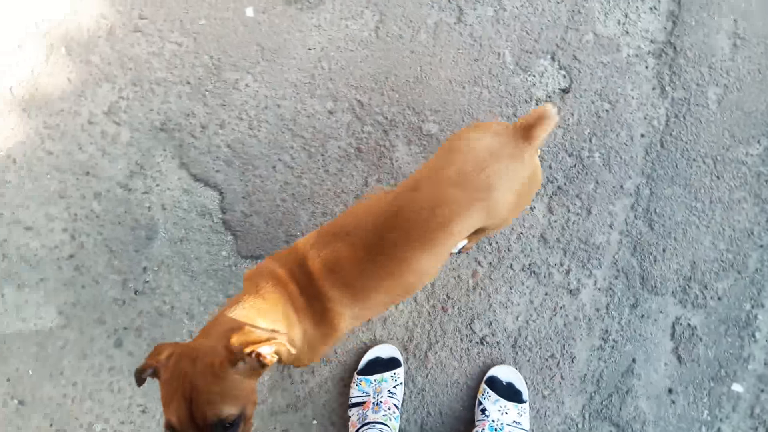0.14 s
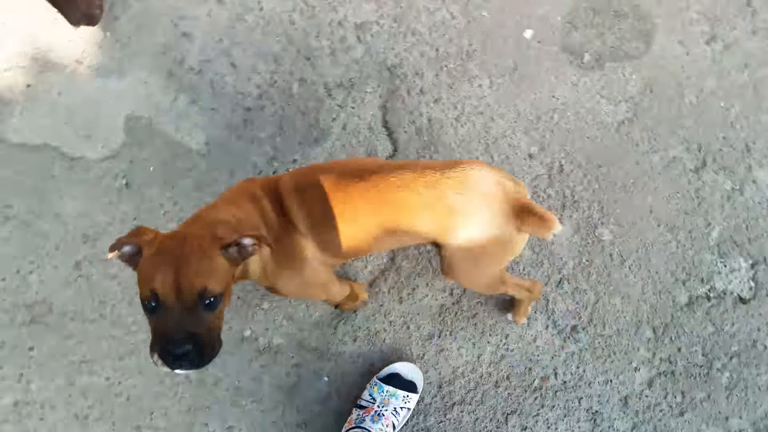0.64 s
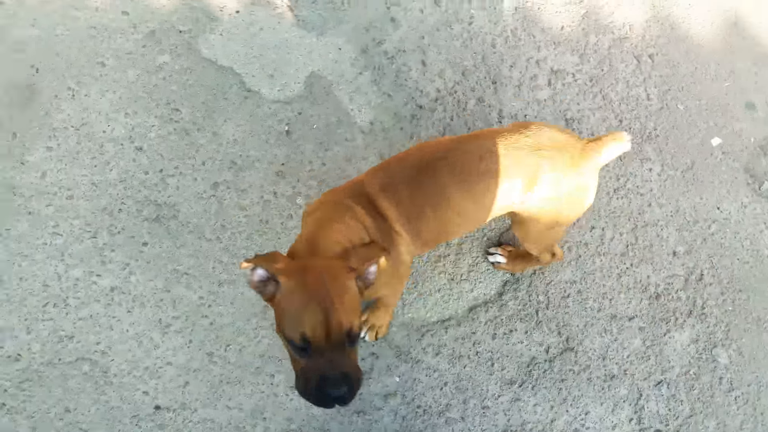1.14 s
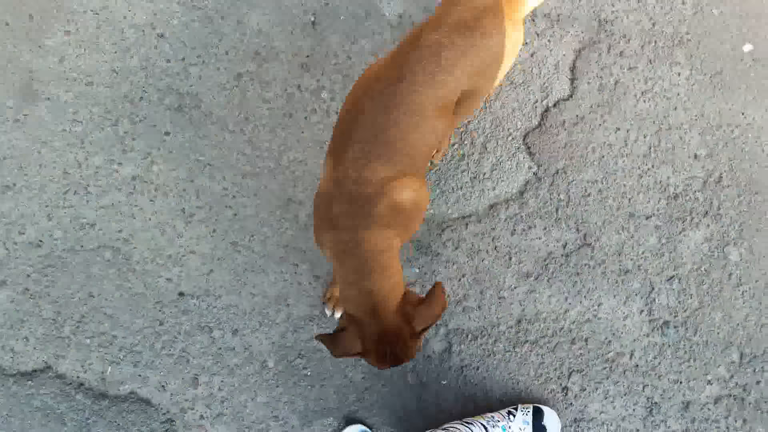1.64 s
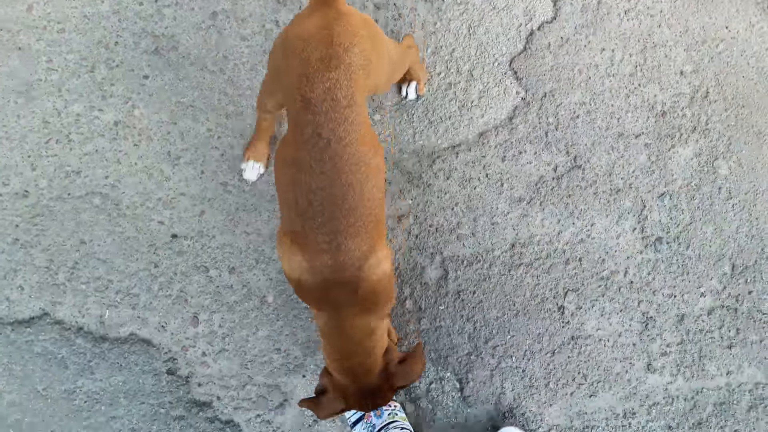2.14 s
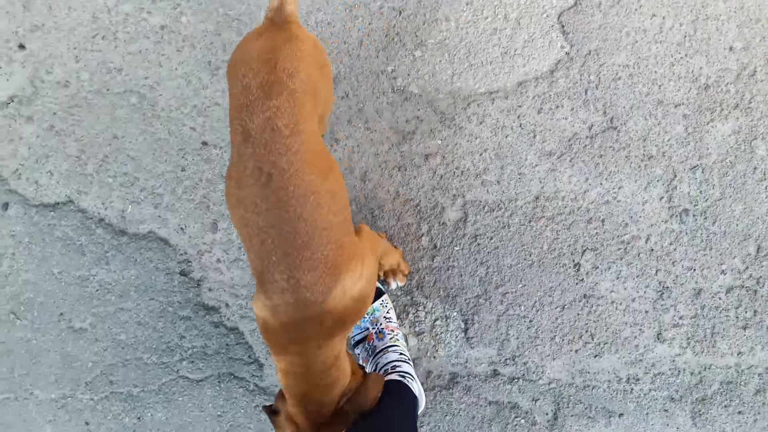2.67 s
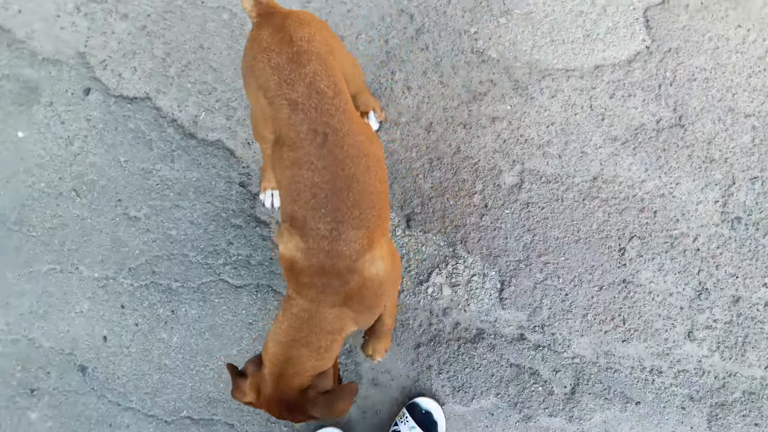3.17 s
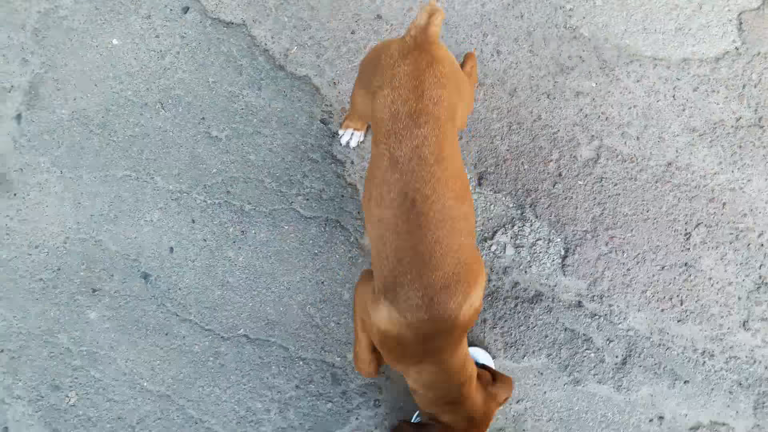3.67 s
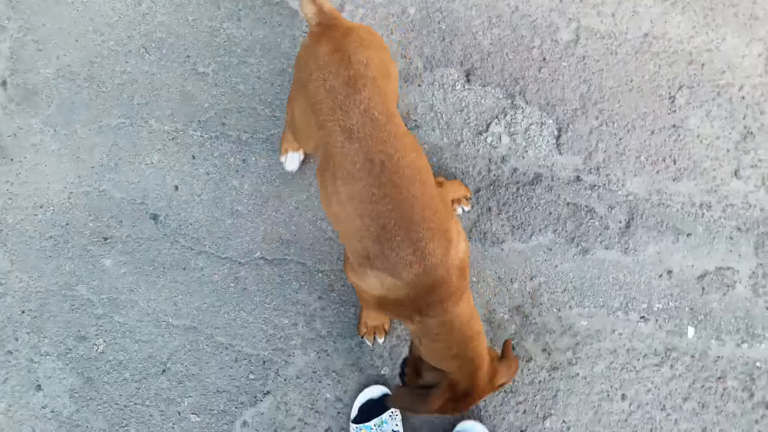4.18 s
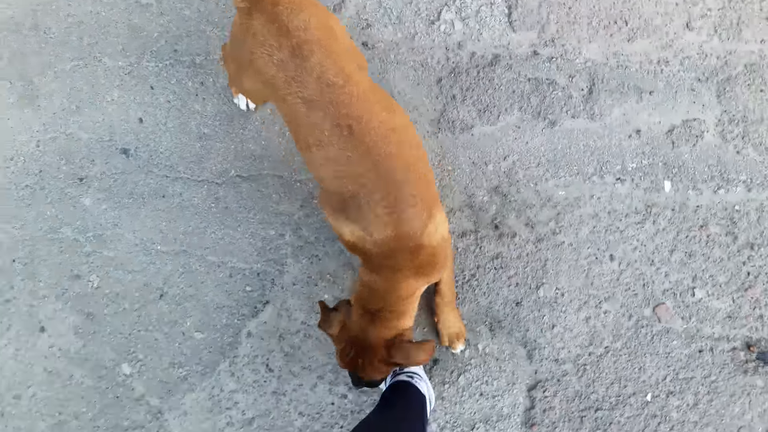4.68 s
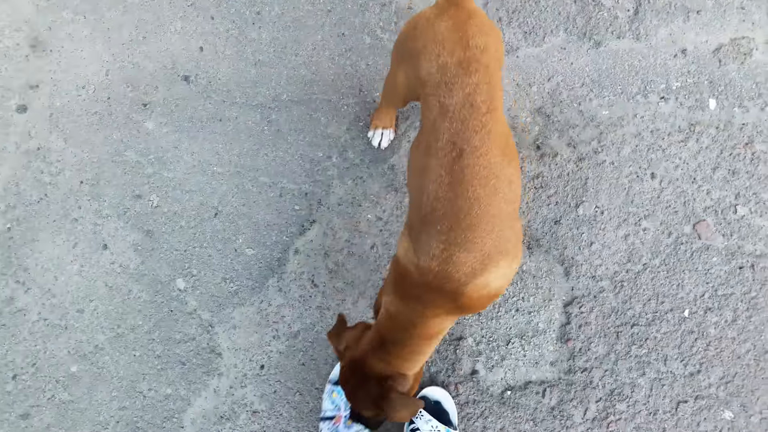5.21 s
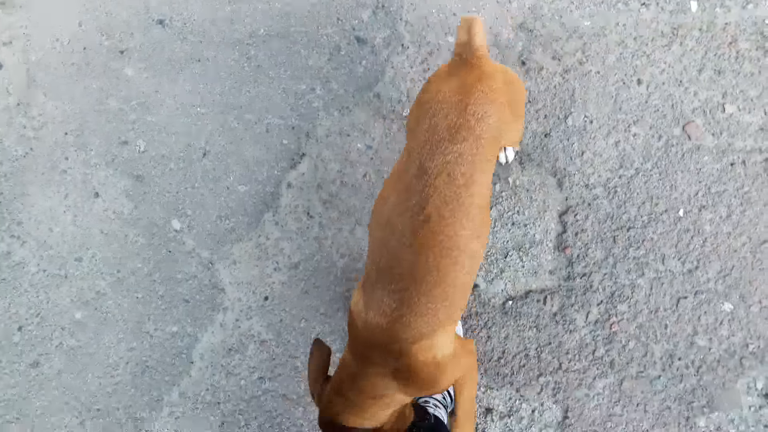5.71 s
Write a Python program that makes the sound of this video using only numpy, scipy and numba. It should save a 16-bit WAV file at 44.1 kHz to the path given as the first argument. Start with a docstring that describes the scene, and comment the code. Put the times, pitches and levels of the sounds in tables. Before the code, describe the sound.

Outdoors on a paved yard, shoes and claws scuff and tick, then a puppy close to the microphone growls low and gives a strong bark. It growls again, then barks together with a hoarser adult dog. A quiet lull with soft footsteps follows before a second loud double bark, more puppy growling and a last yap. Faint birds chirp far off; traffic hiss swells and fades.

```python
"""Traffic hiss, still air and rumble, all shaped noise, run throughout; the hiss swells, fades and returns.
From the start paws and shoes scuff (noise bursts) and tap (damped waves) on a paved yard; walls answer.
A puppy close by growls, then yaps and grunts: vocal-fold pulses and breath ring in moving cavities.
Later small birds call far off in gliding sine tones, and twice an adult dog barks with the puppy,
its clean rising start breaking into a hoarse roar."""
import sys
import numpy as np
from scipy import signal
from scipy.fft import rfft, irfft, next_fast_len
from scipy.io import wavfile
from scipy.ndimage import map_coordinates
from numba import njit

SR = 44100
rng = np.random.default_rng(int(sys.argv[2]) if len(sys.argv) > 2 else 0)


def dump(signal):
    """Clip the signal to [-1, 1] and save it as 16-bit WAV at the path in sys.argv[1]."""
    limited = np.clip(np.atleast_2d(signal).T, -1, 1)
    pcm = np.round(limited * 32767).astype(np.int16)
    wavfile.write(sys.argv[1], SR, pcm)


def volts_from_db(level):
    """Convert decibel levels to linear amplitude ratios."""
    exponent = np.asarray(level, float) / 20
    return 10 ** exponent


N = 257103


def unit(x):
    """RMS normalisation: scales x to rms 1."""
    return x / np.sqrt(np.mean(x ** 2) + 1e-20)


def colour(x, points):
    """Linear filtering in the spectrum: x shaped by (hz, gain_db) points on a log axis."""
    size = next_fast_len(len(x) + 8192)
    hz, db = np.transpose(points)
    bins_hz = np.fft.rfftfreq(size, 1 / SR)
    gain = volts_from_db(np.interp(np.log(bins_hz + 1), np.log(hz + 1), db))
    return irfft(rfft(x, size) * gain, size)[:len(x)]


def curve(rows):
    """Linear interpolation: one value per sample from (time_s, value) rows."""
    return np.interp(np.arange(N) / SR, *np.transpose(rows))


def wobble(n, rate):
    """Band-limited fluctuation: a smooth random curve with rate knots a second."""
    knots = rng.standard_normal(int(n * rate / SR) + 4)
    return map_coordinates(knots, [np.arange(n) * rate / SR])


def add(out, s, x):
    """Superposition: mixes x into out from time s."""
    part = out[round(s * SR):][:len(x)]
    part += x[:len(part)]


def background():
    """Stationary noise: spectra of traffic, still air and rumble, with slowly fluctuating levels."""
    # distant traffic level: time_s, level_db
    traffic_level = [(0, -58), (.5, -52.5), (1, -46.5), (1.5, -48.5), (1.85, -56), (2.4, -66.5), (3, -84.5),
                     (4, -76), (4.5, -73), (5, -62.5), (5.83, -58)]
    # spectrum of the traffic hiss: hz, gain_db
    tyres = [(25, -39), (150, 6.5), (400, -7.5), (1000, -5.5), (2000, -9), (4000, -8), (6000, -15.5),
             (7300, -24), (8100, -39), (9500, -31.5), (12000, -25.5), (16000, -30)]
    # spectrum of the still air: hz, gain_db
    air_spectrum = [(25, -13), (60, -12), (270, -16.5), (600, -22), (1200, -19), (2000, -30.5),
                    (4000, -29.5), (6000, -31.5), (8000, -52), (12000, -42.5), (16000, -47)]
    # low rumble level: time_s, level_db
    rumble_level = [(0.0, -61), (1.91, -75), (2.66, -87.5), (5.83, -63)]
    air_db = -69.5
    traffic = unit(colour(rng.standard_normal(N), tyres))
    traffic *= volts_from_db(curve(traffic_level) + 1.2 * wobble(N, 7.8))
    air = unit(colour(rng.standard_normal(N), air_spectrum))
    air *= volts_from_db(air_db + 0.56 * wobble(N, 7))
    rumble_spectrum = [(15, -20.0), (30, -5.5), (80, 4.5), (140, -29.5), (400, -91)]
    rumble = unit(colour(rng.standard_normal(N), rumble_spectrum))
    rumble *= volts_from_db(curve(rumble_level) + 0.89 * wobble(N, 3))
    return traffic + air + rumble


def taps(events, turns, noisy):
    """Damped oscillation: each contact loses 20 dB in the given turns, with some crackle."""
    out, t = np.zeros(N), np.arange(SR // 20) / SR
    for s, db, hz in events:
        wave = np.sin(2 * np.pi * hz * t) + noisy * rng.standard_normal(len(t))
        add(out, s, volts_from_db(db + 2.0 - 20 * t * hz / turns) * wave)
    return out


def feet():
    """Impact and friction: claw ticks, dull footfalls and grit crunching in clumps under a sole."""
    # claws on the paving, levels ahead of gain and filter: start_s, level_db, pitch_hz
    claws = [(.0194, -43, 9400), (.0494, -48, 5850), (.0634, -40, 11580), (.0777, -39, 11360),
             (.1012, -49, 8800), (1.3618, -47.5, 9230), (1.4904, -50.5, 5760), (1.7644, -51, 5730),
             (2.4563, -58.5, 5160), (3.8911, -52.5, 4970), (3.9764, -51.5, 5040), (4.1834, -54, 5100),
             (4.6264, -55, 4900), (4.6528, -48.5, 4840), (4.7314, -57, 5370), (4.9501, -46, 5190),
             (5.7194, -46.5, 4486)]
    # soft footfalls, levels ahead of gain and filter: start_s, level_db, pitch_hz
    footfalls = [(.014, -35.5, 264), (.072, -63, 400), (.111, -40, 142.5), (2.447, -60, 392),
                 (2.512, -42.5, 496), (2.625, -45.5, 197), (2.639, -35.5, 513), (2.689, -47, 447),
                 (2.769, -45, 1200), (3.286, -42, 449.5), (3.401, -48.5, 196.5), (4.625, -38, 810),
                 (5.322, -29.5, 399.4)]
    # soles dragging over grit: peak_s, level_db, fade_db_per_s
    scuffs = [(0, -31, 357), (2.65, -57, 73.5), (3.26, -61, 298.5), (4.66, -71, 299), (5.738, -64.5, 106)]
    # spectrum of the grit: hz, gain_db
    grit = [(30, -32), (130, -6.5), (700, -7.5), (1600, -10.5), (3500, -14.5), (6000, -23.5), (8000, -40.5),
            (12000, -27.5), (16000, -31)]
    rise_db_per_s = 351.5
    ticks = colour(taps(claws, turns=5.0, noisy=0.27), [(800, -25.5), (3500, 6.5)])
    dull = [(30, -25.5), (150, 3), (1200, -3.5), (3000, -22.5), (16000, -54.5)]
    steps = colour(taps(footfalls, turns=1.6, noisy=2.3), dull)
    grains = rng.standard_normal(N) * volts_from_db(3 * wobble(N, 300))  # clumps of grains
    t = np.arange(N) / SR
    drag = np.zeros(N)
    for s, db, fade in scuffs:
        drag += volts_from_db(db - np.maximum(rise_db_per_s * (s - t), fade * (t - s)))
    return ticks + steps + drag * unit(colour(grains, grit))


def yard(x, delay):
    """Reverberation: after a delay in s, each frequency of the walls' answer decays at its own speed."""
    # decay time of the walls' answer: hz, t60_s
    decay = [(150, 0.6), (700, 0.29), (3000, 0.35), (8000, 0.28)]
    hz, t, z = signal.stft(rng.standard_normal(SR // 2), SR, nperseg=256)
    decay_hz, decay_s = np.transpose(decay)
    t60 = np.interp(np.log(hz + 1), np.log(decay_hz), decay_s)
    tail = signal.istft(z * volts_from_db(-60 * t / t60[:, None]), SR, nperseg=256)[1]
    late = np.pad(x, (round(delay * SR), 0))
    return signal.fftconvolve(late, tail / np.linalg.norm(tail))[:N]


@njit
def ring(x, turn, r):
    """Resonance: a two-pole filter of peak gain about 1 whose centre moves from sample to sample."""
    y = np.zeros(len(x))
    for i in range(2, len(x)):
        y[i] = (1 - r * r) / 2 * (x[i] - x[i - 2]) + r * turn[i] * y[i - 1] - r * r * y[i - 2]
    return y


def formant(x, hz, width_hz):
    """Cascaded resonance: three equal passes, scaled to keep white noise near rms 1."""
    turn, r = 2 * np.cos(2 * np.pi * hz / SR), np.exp(-np.pi * width_hz / SR)
    rung = ring(ring(ring(x, turn, r), turn, r), turn, r)
    return rung * np.sqrt(3 * SR / np.pi / width_hz)


def voice(calls, widths_hz, tone_db, nose_db, jitter, scatter_db, cheek_hz, cheek_db):
    """Source and filter: fold pulses and breath gated each cycle ring in three moving cavities and a fixed one."""
    # breathy top of a voice: hz, gain_db
    breath_top = [(3300, -59), (4000, 3.5), (5000, 4.5), (7000, -3.5), (8000, -26.5), (10000, -12.5),
                  (15000, -25), (17000, -59.5)]
    rasp = .2  # extra share of breath in the upper cavities
    out, top = np.zeros((2, N))
    for rows in calls:
        s, *cols = np.transpose(rows)
        t = np.arange(s[0], s[-1] + .02, 1 / SR)
        pitch, chest_db, chest, mouth_db, mouth, muzzle_db, muzzle, rough = [np.interp(t, s, c) for c in cols]
        rough = np.clip(rough, 0, 1)
        cycles = np.cumsum(pitch * (1 + jitter * rough * wobble(len(t), 120))) / SR
        strength = volts_from_db(scatter_db * rough * wobble(len(t), 70))  # uneven folds: the strength throbs
        pulses = np.diff(np.floor(cycles), prepend=0) * np.sqrt(SR / pitch)
        breath = 2 * (1 - cycles % 1) ** 2 * rng.standard_normal(len(t))
        edge = np.clip(np.minimum(t - s[0], s[-1] + 0.015 - t) / 0.0049, 0, 1)
        swell = edge * strength
        source = swell * (np.sqrt(1 - rough) * pulses + np.sqrt(rough) * breath)
        airy = rough + rasp * (1 - rough)
        raspy = swell * (np.sqrt(1 - airy) * pulses + np.sqrt(airy) * breath)
        sound = volts_from_db(chest_db + tone_db) * swell * np.sin(2 * np.pi * cycles)
        chest_width, mouth_width, muzzle_width = widths_hz
        sound += volts_from_db(chest_db) * formant(source, chest, chest_width)
        sound += volts_from_db(mouth_db) * formant(source, mouth, mouth_width)
        sound += volts_from_db(muzzle_db) * formant(raspy, muzzle, muzzle_width)
        sound += volts_from_db(muzzle_db + cheek_db) * formant(raspy, cheek_hz + 0 * t, 450)
        add(out, s[0], sound)
        add(top, s[0], volts_from_db(muzzle_db + nose_db) * swell * breath)
    return out + colour(top, breath_top)


def growl(tone, rows, rough):
    """Tract coupling: chest resonance, muzzle level and roughness follow how far the mouth is open."""
    chest_lift_hz_per_db = 2  # an opening mouth lifts the chest resonance
    smoother_per_db = .009  # roughness rises as the mouth shuts
    chest, muzzle, under = tone
    call = []
    for s, hz, chest_db, mouth_db, mouth in rows:
        opening_db = mouth_db - chest_db
        muzzle_db = mouth_db - np.interp(s, *np.transpose(under))
        call.append((s, hz, chest_db, chest + chest_lift_hz_per_db * opening_db, mouth_db, mouth,
                     muzzle_db, muzzle, rough - smoother_per_db * opening_db))
    return call


def puppy():
    """Source and filter in one small throat: growls, grunts and yaps."""
    # growls: (chest_hz with mouth level equal to chest level, muzzle_hz, [time_s, muzzle_under_mouth_db]),
    # then the curve: time_s, pitch_hz, chest_db, mouth_db, mouth_hz
    growls = [ ((333, 1000, [(.45, 39), (.7, 16.5)]), [(.17, 115.1, -49.5, -75, 750),
              (.34, 125.6, -48.5, -68.5, 750), (.385, 136.4, -35, -47.5, 700),
              (.41, 138.9, -31, -41.5, 714), (.47, 132.7, -46, -67, 730), (.56, 160.2, -45.5, -60.5, 760),
              (.64, 156, -40.5, -65.5, 805), (.74, 157, -43, -54, 760), (.8, 158.2, -40, -56.5, 780),
              (.89, 154.3, -38.5, -69.5, 790)]), ((326, 1800, [(1.2, 23.5), (1.36, 10.5), (1.5, 27)]),
              [(1.07, 124, -30, -40.5, 850), (1.108, 110.7, -42.5, -49.5, 850), (1.155, 111, -38, -56, 895),
              (1.195, 129, -31, -30, 935), (1.24, 148.6, -27, -28, 806), (1.3, 150.2, -28, -40, 950),
              (1.36, 155.7, -29, -37, 966), (1.409, 151.7, -36.5, -40.5, 1136),
              (1.444, 147.9, -41, -54.5, 1120), (1.52, 143.6, -39.5, -34, 800),
              (1.55, 144.8, -42.5, -36, 917), (1.575, 144.2, -44.5, -58, 910), (1.62, 143, -56, -70, 910)]),
              ((271, 2910, [(4.1, 5), (4.3, 24), (4.8, 15), (5.02, 33.5)]), [(4.081, 133, -45.5, -38, 930),
              (4.159, 128.2, -50.5, -68, 800), (4.241, 143.2, -41, -73, 610),
              (4.34, 158.1, -40, -66.5, 645), (4.44, 145.7, -44.5, -64.5, 728),
              (4.53, 131.8, -47, -60, 838), (4.66, 126.5, -44, -58, 855), (4.734, 118.5, -40, -44, 1071),
              (4.949, 109.1, -42, -51.5, 1000), (5.002, 110.1, -36.5, -36.5, 991),
              (5.051, 112.2, -38, -33.5, 1046), (5.135, 117.9, -41.5, -37.5, 1057),
              (5.155, 126.3, -54, -51, 1000)]), ((290, 2720, [(5.8, 18)]), [(5.762, 62, -46.5, -38.5, 950),
              (5.79, 104, -45, -40, 933), (5.829, 111.3, -38.5, -31.5, 1050)]), ]
    # grunts: peak_s, level_db
    grunts = [(2.475, -59.5), (2.99, -64.5), (3.234, -62)]
    # barks: (chest_db, chest_share of the swell, chest_lift_hz and widest_mouth_hz at top pitch, muzzle_hz),
    # then the curve: time_s, pitch_hz, mouth_db
    barks = [ ((-12, 0.82, 138, 1290, 2400.5), [(.885, 154.6, -67), (.915, 201.6, -35),
             (.945, 288.4, -16.5), (.98, 329, -22), (1.02, 273.4, -35.5), (1.075, 129.4, -43)]),
             ((-29.5, 0.44, 14, 1358, 2454.5), [(1.908, 303.8, -17), (1.93, 446, -13), (1.99, 458.2, -36),
             (2.02, 319.2, -32), (2.055, 255.7, -29.5), (2.09, 268.3, -46.5)]),
             ((-30, 0.22, 20, 869, 2446.5), [(3.632, 381.3, -17), (3.65, 455.9, -15), (3.68, 424.6, -13),
             (3.72, 342.3, -29), (3.76, 238.7, -19), (3.81, 175.4, -62)]), ((-33, 0.37, 15, 1348.5, 2655),
             [(3.975, 375.8, -43), (3.99, 423, -34.5), (4.026, 465.6, -28), (4.048, 434.6, -31),
             (4.063, 351.7, -29.5), (4.085, 135.7, -38.5)]), ((-40.5, 0.05, 18, 1067.5, 2886.5),
             [(5.413, 348.4, -34), (5.43, 379.8, -25), (5.455, 468.3, -18), (5.478, 454.3, -20.5),
             (5.495, 370.8, -17.5), (5.51, 249.6, -36), (5.53, 200, -55.5)]), ]
    growl_rough = [.1, .18, .14, .2]  # with mouth level equal to chest level
    bark_rough = [.09, .18, .14, .06, .08]  # at the top pitch of each bark
    low = [growl(*c, r) for c, r in zip(growls, growl_rough)] + [grunt(*c) for c in grunts]
    yaps = [bark(*c, r) for c, r in zip(barks, bark_rough)]
    low_voice = voice(low, widths_hz=[280, 400, 400], tone_db=-11, nose_db=-10.5,
                      jitter=.1, scatter_db=4, cheek_hz=4000, cheek_db=-9.5)
    high_voice = voice(yaps, widths_hz=[330, 480, 800], tone_db=-5, nose_db=-26,
                       jitter=.1, scatter_db=5.5, cheek_hz=1870, cheek_db=-2)
    return low_voice + high_voice


def bark(tone, rows, rough):
    """Fold tension: the mouth opens with the pitch, the chest rings on it, slackening folds rattle."""
    shut_mouth_hz, low_chest_hz, muzzle_under_db = 750, 241, 11
    slack_rough = .4  # slack folds rattle
    chest_db, share, lift, widest, muzzle = tone
    s, hz, db = np.transpose(rows)
    tense = hz / hz.max()
    chest = np.maximum(hz + lift * tense, low_chest_hz)
    mouth = shut_mouth_hz + (widest - shut_mouth_hz) * tense ** 2.1
    chest_level = chest_db + share * (db - db.max())
    rattle = rough + slack_rough * (1 - tense) ** 2
    return np.transpose([s, hz, chest_level, chest, db, mouth, db - muzzle_under_db, muzzle + 0 * s, rattle])


def birds():
    """Frequency modulation: far whistlers glide a sine tone, each repeating its own note."""
    # notes, ahead of each call's pitch factor and level: length_share, pitch_hz, level_db
    arch = [(0, 3660, -4.5), (.25, 4400, 5.5), (.5, 4550, 2), (1, 4384, -2)]
    slide = [(0, 6000, -4), (.2, 6250, 0), (.4, 5850, -2), (.65, 4700, -5), (1, 3400, -8)]
    rise = [(0, 3200, 1), (.35, 4000, 2.5), (.7, 4400, -13), (1, 4350, -8)]
    droop = [(0, 4390, -9), (.6, 4090, 2.5), (1, 4050, -4.5)]
    # calls of each note: start_s, length_s, pitch_factor, level_db
    arch_calls = [(1.79, 0.069, 1, -60.5), (2.154, 0.046, 0.97, -61)]
    slide_calls = [(3.343, 0.11, 0.95, -64.5), (3.525, 0.11, 0.98, -63.5), (4.795, 0.095, 0.98, -71),
                   (4.962, 0.083, 0.98, -61), (5.142, 0.087, 0.97, -58)]
    rise_calls = [(5.348, 0.11, 0.98, -62), (5.574, .12, 0.94, -58)]
    droop_calls = [(3.14, .11, 1, -70.5)]
    out = np.zeros(N)
    for note, calls in [(arch, arch_calls), (slide, slide_calls), (rise, rise_calls), (droop, droop_calls)]:
        share, hz, level_db = np.transpose(note)
        for s, length, factor, db in calls:
            u = np.arange(0, 1, 1 / (length * SR))
            tone = np.sin(2 * np.pi * np.cumsum(factor * np.interp(u, share, hz)) / SR)
            level = volts_from_db(db + np.interp(u, share, level_db)) * np.sin(np.pi * u) ** .4
            add(out, s, level * tone)
    return out


def roar(breaks, rows):
    """Register break: cavities follow the pitch until the voice breaks, then the chest settles."""
    chest_hz, jaw_hz, snout_hz = 760, 1552, 2410  # chest of the roar, highest mouth, snout
    chest_under_db, roar_gain_db, snout_under_db = 9.5, 11, 12  # chest and snout come up with the roar
    clean, hoarse, break_s = .06, .7, .015  # roughness before and after the break, its duration
    s, hz, db = np.transpose(rows)
    broken = np.clip((s - breaks) / break_s, 0, 1)
    chest = (1 - broken) * 1.07 * hz + broken * chest_hz
    mouth = np.minimum(2.9 * hz, jaw_hz)
    gain_db = roar_gain_db * broken
    snout_db = db - snout_under_db + 0.78 * gain_db
    rough = clean + (hoarse - clean) * broken
    return np.transpose([s, hz, db - chest_under_db + gain_db, chest, db, mouth, snout_db, snout_hz + 0 * s, rough])


def adult():
    """Source and filter in the adult dog's throat, whose pulses turn to breath at the break."""
    # barks: break_s at which the clean rising start turns to a hoarse roar,
    # then the curve: time_s, pitch_hz, mouth_db
    adult_barks = [ (1.912, [(1.87, 401.7, -63.5), (1.885, 440.6, -29), (1.9, 533.2, -15.5),
                   (1.912, 610, -16.5), (1.918, 797.5, -20.5), (1.975, 786, -15.5), (2.01, 744, -25),
                   (2.07, 701, -44.5)]), (3.64, [(3.606, 459, -49.5), (3.614, 516, -29),
                   (3.632, 570.1, -20), (3.65, 588.6, -19.5), (3.7, 555.5, -20), (3.75, 539.5, -31),
                   (3.81, 528.3, -43)]), ]
    return voice([roar(*c) for c in adult_barks], widths_hz=[330, 300, 1300], tone_db=-17.0, nose_db=-16,
                 jitter=.08, scatter_db=3.5, cheek_hz=4980, cheek_db=-29)


def grunt(s, db):
    """Brief phonation: a short closed-mouth push of the voice at steady pitch."""
    hz, chest, mouth, muzzle, rough = 130, 264, 680, 3000, .45  # pitch and cavities in Hz, roughness
    rise_s, fall_s, fade_db = 0.035, 0.04, 5.5
    levels = [(s - rise_s, db - fade_db), (s, db), (s + fall_s, db - fade_db)]
    return [(at, hz, level, chest, level - 13.5, mouth, level - 22, muzzle, rough) for at, level in levels]


def scene():
    """Direct and reverberant sound: near sources are dry, far ones wet."""
    ground, small, far, big = feet(), puppy(), birds(), adult()
    walls = volts_from_db(-13) * yard(ground, 0.015) + volts_from_db(-8.5) * yard(small, .02)
    walls += volts_from_db(3.0) * yard(far, .012) + volts_from_db(-1.5) * yard(big, .015)
    return (background() + ground + small + far + big + walls)[None]


def band_limit(x):
    """A steep low-pass at the top of the band."""
    return signal.sosfilt(signal.butter(12, 15800, fs=SR, output="sos"), x)


def record(dry):
    """Saturation and band limits: the microphone rounds off the loudest peaks and drops the deepest bass."""
    x = dry[0] / (1 + np.abs(dry[0] / 1.1) ** 6) ** (1 / 6)
    x = colour(x, [(20, -14.5), (70, 2), (150, 2), (20000, -4.0)])
    return band_limit(x[None])


dry = scene()
out = record(dry)
dump(out)
```